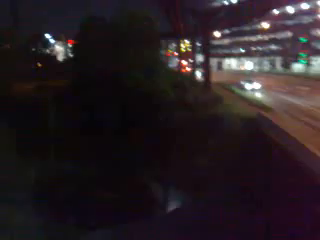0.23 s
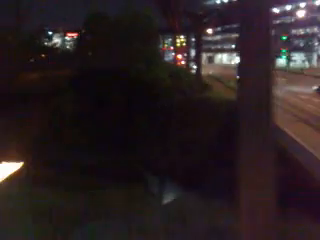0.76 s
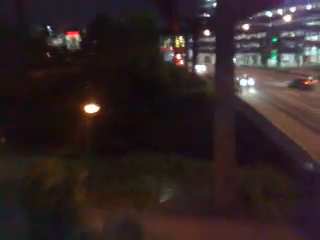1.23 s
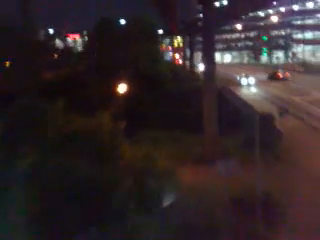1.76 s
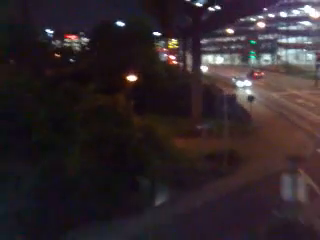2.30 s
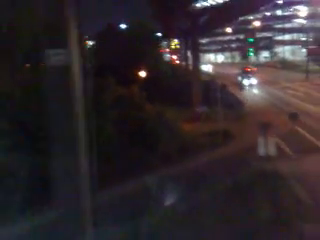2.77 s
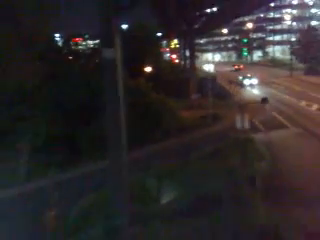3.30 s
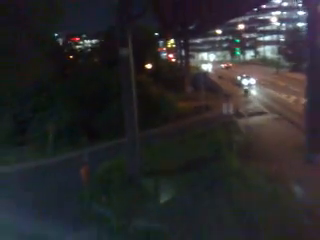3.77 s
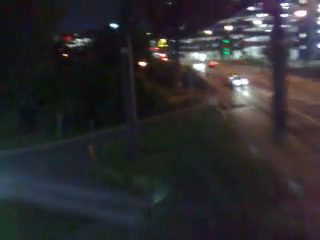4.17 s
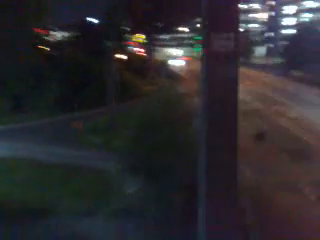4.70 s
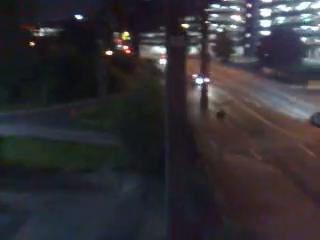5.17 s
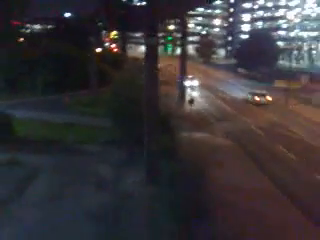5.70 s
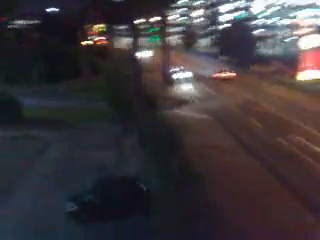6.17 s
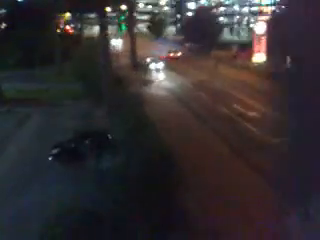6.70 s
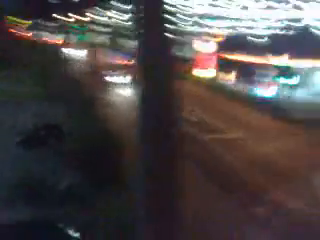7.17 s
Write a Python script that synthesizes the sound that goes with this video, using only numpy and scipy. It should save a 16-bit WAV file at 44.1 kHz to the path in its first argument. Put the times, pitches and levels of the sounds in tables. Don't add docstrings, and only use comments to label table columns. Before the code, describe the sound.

Inside a suspended rail car gliding above a night road, the beam and body rumble constantly while rubber tyres roar softly overhead. Fans and electrics hum underneath. Low thumps and roof knocks cluster in the middle, pillars pass with brief swishes, and small high chirps appear. Towards the end a raspy mains buzz grows as the drive takes power. A small camera microphone makes it narrow, dull and grainy.

```python
import sys
import numpy as np
from scipy import signal
from scipy.fft import rfft, irfft, dct, next_fast_len
from scipy.io import wavfile
from scipy.ndimage import uniform_filter1d

SR = 44100
rng = np.random.default_rng(int(sys.argv[2]) if len(sys.argv) > 2 else 0)


def invert_db(x):
    u = np.asarray(x, float) / 20
    return 10 ** u


def int16_out(signal):
    q = np.round(np.clip(np.atleast_2d(signal).T, -1, 1) * 32767)
    wavfile.write(sys.argv[1], SR, q.astype(np.int16))


N = 328545
TIME = np.arange(N) / SR
MAINS_HZ = 50.055
CAMERA_SR = 16000


def curves(table):
    s, *columns = np.transpose(table)
    return [np.interp(TIME, s, c) for c in columns]


def colour(hz, table):
    table_hz, table_db = np.transpose(table)
    return np.interp(np.log(np.maximum(hz, 1)), np.log(table_hz), table_db)


def unit(x):
    return x / np.sqrt(np.mean(x ** 2))


def smooth_twice(x, size):
    return uniform_filter1d(uniform_filter1d(x, size), size)


def walk(rate_hz):
    k = int(SR / rate_hz)
    held = np.repeat(rng.standard_normal(N // k + 1), k)
    return 1.3 * smooth_twice(held, k)[:N]


def bell(s, length_s):
    return np.exp(-.5 * ((TIME - s) / length_s) ** 2)


def swells(events):
    return sum(np.outer(row[1:-1], bell(row[0], row[-1])) for row in events)


def layers(table, edges_hz, levels_db, flicker_db, rate_hz, even=0.):
    size = next_fast_len(N)
    hz = np.arange(size // 2 + 1) * SR / size
    noise = rfft(rng.standard_normal(size)) * invert_db(colour(hz, table))
    above = [1 / (1 + (e / np.maximum(hz, 1)) ** 12) for e in edges_hz]
    out = 0
    for k, db in enumerate(levels_db):
        band = irfft(noise * above[k] * (1 - above[k + 1]), size)[:N]
        power = smooth_twice(band ** 2, SR // 20)
        band = band * (np.mean(power) / power) ** (even / 2)
        out = out + band * invert_db(db - np.mean(db) + flicker_db * walk(rate_hz))
    return unit(out)


def tone(hz, wander_hz=0., rate_hz=4):
    cycles = np.cumsum(hz + wander_hz * walk(rate_hz)) / SR + rng.random()
    return np.sqrt(2) * np.sin(2 * np.pi * cycles)


def rumble():
    # start_s, sway_db, boom_db, length_s
    lurches = [(.05, -0.5, 2.5, 0.1), (.35, 2, 2.5, 0.11), (.87, -2, -7.5, .05), (1.06, 12, 2, .05),
               (1.3, 0, 4, 0.086), (1.52, 10, 2, 0.093), (1.88, 3.5, 5, .1), (2.48, 6.5, 4, 0.055),
               (2.63, 5.5, -4.5, 0.045), (2.74, 7, -0.5, 0.034), (2.87, 7, 6, .04), (2.99, 4, 1, .04),
               (3.08, 0.5, 8, 0.043), (3.26, 0.5, 8, 0.028), (3.49, -8, 5, 0.04), (3.78, 5.5, -1.5, 0.063),
               (4.0, 3, 0, .07), (4.43, -2, 5.5, 0.046), (4.84, -1.5, 4, .04), (5.25, -2, 4.5, 0.037),
               (5.52, 10.5, 8, .07), (5.76, 4.5, 11.5, .035), (6.06, -8.5, 0, 0.052), (6.35, 2, 6, 0.16),
               (6.98, 6, 0, .05), (7.24, 3.5, -1.5, .05)]
    # start_s, level_db
    track = [(0, 2), (.9, -2), (1.2, 0), (2.1, 3), (2.8, -2.5), (3.3, 0), (4.45, 1), (5.2, -3.5),
             (5.55, -1), (5.85, -2), (6.4, -1.5), (7.45, -1.5)]
    boom_per_track, panel_per_boom = 0.28, 0.12
    sway_db, boom_db = swells(lurches)
    track_db = curves(track)[0]
    return [sway_db, boom_db + boom_per_track * track_db, track_db + panel_per_boom * boom_db]


def body():
    # freq_hz, level_db (per Hz)
    shell = [(12, -34), (24, -2.5), (32, -6.5), (58, 0), (78, -7.5), (97, -2), (112, -8), (140, -7.5),
             (160, -8.5), (180, -6.5), (214, -10.5), (225, -8), (240, -14.5), (290, -16.5), (450, -20.5),
             (600, -44.5)]
    # start_s, peak_db, pitch_hz, t60_s
    joints = [
        (1.544, -12, 185.6, 0.24),
        (1.815, -13, 155, 0.2),
        (3.086, -13, 186, 0.34),
        (3.235, -7, 176.6, 0.25),
        (3.322, -21, 177, 0.17),
        (3.429, -17, 175, 0.22),
        (3.561, -17.5, 184.5, 0.21),
        (3.63, -18.5, 179, 0.16),
        (3.816, -10, 178.4, 0.18),
        (3.959, -11, 185, 0.15),
    ]
    out = invert_db(-22.5) * layers(shell, [14, 45, 125, 440], rumble(), flicker_db=-1.5, rate_hz=10, even=0.62)
    for s, db, hz, t60_s in joints:
        t = np.maximum(TIME - s, 0)
        attack = 1 - np.exp(-t / 0.0071)
        decay = np.exp(-np.log(1000) * t / t60_s)
        out += invert_db(db - 1.0) * attack * decay * np.sin(2 * np.pi * hz * t)
    return out


def rolling():
    # start_s, load_db, wall_nearness_db
    tyres = [(0, -2.5, 2), (.3, 1.5, 0.5), (.75, -1.5, 4.5), (1.05, 0.5, 0), (1.4, -1, -0.5),
             (2.0, 0.5, 0.5), (2.35, 3, -1), (2.65, 4, -2.5), (2.95, 3.5, -3), (3.28, 1, 0.5),
             (3.4, -2, -2.5), (4.0, -1, -2), (5.1, -0.5, -5), (5.75, -1.5, -2), (6.4, -2.5, -0.5),
             (6.6, -2, 0), (7.1, 2, 1.5), (7.45, -5, 1)]
    # start_s, level_db, extra_treble_db, length_s
    pillars = [(.24, 2.5, 1, .04), (.45, 6.5, -2.5, .035), (.59, 4.5, -2, .03), (.97, 1.5, 1, .03),
               (1.49, -1, 2.5, 0.023), (1.78, 2, -1, 0.06), (2.45, 1.5, -1, .04), (2.84, 3, -1.5, 0.046),
               (3.15, 0, 2, 0.033), (3.75, 2, 5.5, 0.033), (4.43, 4.5, -0.5, 0.036), (5.48, 1, 1.5, 0.034),
               (5.62, 2.5, 1.5, 0.025), (6.69, 3, 5.5, .03), (7.11, -1, 6, 0.079), (7.4, 1, 3.5, 0.043)]
    per_load = (0.52, 1., 0.49, 0.55)
    per_wall = (0.0089, 0.01, 0.98, .4)
    per_pillar = (0.36, 1.1, 0.97, 0.33)
    per_treble = (0.013, 0.011, 0.16, 1.4)
    causes_db = np.vstack([curves(tyres), swells(pillars)])
    return np.array([per_load, per_wall, per_pillar, per_treble]).T @ causes_db


def wheels():
    # freq_hz, level_db (per Hz)
    tread = [(200, -35), (300, -3.5), (430, -8), (520, -10.5), (640, -10.5), (1000, -15), (1480, -18),
             (1700, -24.5), (2350, -22.5), (3050, -25), (3700, -33), (4150, -29), (5000, -36.5),
             (5550, -39.5), (6200, -40), (7000, -57.5), (7600, -74)]
    # freq_hz, width_hz, level_db
    cabin = [(710.4, 22, -0.5), (1021, 30, 2.5), (1214, 40, 4), (1404, 21, -0.5), (1500, 21, 2.5),
             (2109, 24, 3), (2334, 40, 4), (2656, 24, 2.5), (2990, 40, 3)]
    roll = layers(tread, [300, 640, 1650, 3350, 7400], rolling(), flicker_db=0.8, rate_hz=12, even=0.32)
    rings = 0
    for hz, width_hz, db in cabin:
        b, a = signal.iirpeak(hz, hz / width_hz, SR)
        rings = rings + invert_db(db - 6.5 + 4.4 * walk(3)) * signal.lfilter(b, a, roll)
    return invert_db(-37) * (roll + rings)


def electrics():
    # start_s, level_db
    current = [(0, 0), (.9, -1), (1.4, -5), (2.05, -4.5), (2.25, -2.5), (2.85, -4), (3.3, -7.5), (4.0, -7),
               (4.2, -11.5), (4.35, -4), (4.65, -10.5), (4.85, 1.5), (5.6, -2.5), (5.95, -2), (6.3, -1.5),
               (7.45, 1)]
    current_db = curves(current)[0]
    power_on_s, power_rise_db = 5.2, 3
    traction = np.clip((TIME - power_on_s) / 0.19, 0, 1)
    sixth_db = -35 + .6 * current_db + power_rise_db * traction
    twelfth_db = -40.5 + current_db
    slows_s, beat_hz, slower_beat_hz, depth = 3.5, 2., 1.82, .85
    beats = (TIME - slows_s) * np.where(TIME < slows_s, beat_hz, slower_beat_hz)
    beat_power = (1 + depth ** 2 - 2 * depth * np.cos(2 * np.pi * beats)) / (1 + depth) ** 2
    blade_db = -35.5 + 0.25 * (TIME - slows_s) + 10 * np.log10(beat_power)
    panel_db = 6 * bell(3.5, 0.23)
    third_db = -36 - 1.2 * current_db + panel_db + 3 * walk(5)
    return sixth_db, twelfth_db, blade_db, third_db


def hum():
    # start_s, level_db
    whine_level = [(0, -81.5), (2.3, -74), (2.45, -59.5), (2.8, -61.5), (3.15, -63), (3.45, -64.5),
                   (3.95, -62), (4.2, -82.5), (7.45, -81)]
    fan_hz, fan_db, whine_hz = 59.6, -37, 4096
    sixth_db, twelfth_db, blade_db, third_db = electrics()
    sixth = invert_db(sixth_db - 1 + walk(25)) * tone(6 * MAINS_HZ, .6, 12)
    twelfth = invert_db(twelfth_db - 1 + walk(25)) * tone(12 * MAINS_HZ, .9, 12)
    blade = invert_db(blade_db - 1) * tone(fan_hz * 6, .7)
    third = invert_db(third_db - 9) * tone(fan_hz * 3, 3., 8)
    shaft = invert_db(fan_db + 2 * walk(2.9)) * tone(fan_hz, 2.)
    whine = invert_db(curves(whine_level)[0] + 2 * walk(40)) * tone(whine_hz, 10., 40)
    return sixth + twelfth + blade + third + shaft + whine


def passing():
    # start_s, freq_hz, width_hz, level_db, length_s
    swishes = [(0.41, 2580, 704, -48, 0.021), (0.987, 2400, 820, -46, 0.033),
               (1.464, 4530, 730, -59, 0.023), (3.743, 6020, 310, -58, 0.027),
               (4.42, 2980, 690, -46.5, .035), (6.695, 2840, 250, -44.5, 0.03),
               (6.696, 4570, 607, -49.5, 0.023), (6.648, 2850, 120, -57.5, .25),
               (0.555, 2000, 885, -48.5, 0.037), (2.5, 2520, 760, -49, 0.094),
               (7.105, 2100, 650, -48, 0.063)]
    # start_s, pitch_hz, level_db, length_s
    chirps = [
        (2.92, 4020, -60, .02),
        (3.16, 3950, -59, .025),
        (4.78, 4230, -61, .015),
        (5.005, 4210, -55, .015),
        (5.21, 4300, -55, .02),
        (5.84, 4300, -59, .012),
        (6.03, 4220, -57, .025),
    ]
    out = 0
    for s, hz, width_hz, db, length_s in swishes:
        sos = signal.butter(2, [hz - width_hz / 2, hz + width_hz / 2], "band", fs=SR, output="sos")
        hiss = unit(signal.sosfilt(sos, rng.standard_normal(N)))
        out = out + invert_db(db) * bell(s, length_s) * hiss
    for s, hz, db, length_s in chirps:
        out = out + invert_db(db + 2 * walk(80)) * bell(s, length_s) * tone(hz, 12., 40)
    return out


def choke():
    # start_s, level_db
    effort = [(0, -68), (.3, -67), (.44, -81.5), (.56, -66.5), (.81, -62.5), (1.3, -68.5), (1.9, -83.5),
              (2.03, -69.5), (3.6, -69), (4.25, -65.5), (4.75, -71.5), (5.44, -55.5), (5.77, -50),
              (6.27, -50), (6.43, -45.5), (6.87, -49.5), (7.2, -49), (7.45, -41.5)]
    # start_s, level_db, length_s
    surges = [
        (3.76, 5, 0.036),
        (6.68, 1, 0.055),
        (7.07, 5.5, .035),
        (7.26, 3, 0.02),
        (7.37, -5, 0.023),
    ]
    # freq_hz, level_db
    housing = [(1400, -6), (2000, -11.5), (2450, -15.5), (2850, -3.5), (3400, -14), (4300, -9.5),
               (5000, -9.5), (5500, -9), (5850, -8), (6300, -3), (6650, 1), (6950, -8.5), (7150, -8.5),
               (7500, -32.5)]
    # freq_hz, level_db
    loud_partials = [(4506, -65), (4807, -66), (4904, -66), (5103, -68), (5206, -67), (5308, -70),
                     (5405, -68), (5507, -73), (5604, -68), (5706, -69), (5809, -61), (5905, -65),
                     (6008, -64), (6105, -63), (6207, -65), (6309, -61), (6406, -63), (6605, -55),
                     (6708, -58), (6804, -68), (6907, -65), (7106, -79), (7208, -71), (7305, -71),
                     (7413, -80), (1802, -64), (2002, -64), (2703, -64), (2803, -62)]
    peaks_db = {int(round(hz / MAINS_HZ)): db for hz, db in loud_partials}
    partials = 0
    for k in range(28, 149):
        hz = k * MAINS_HZ
        odd_loss_db = 9 * (k % 2)
        db = colour(hz, housing) - 60 - odd_loss_db + 3 * np.clip(rng.standard_normal(), -2, .5)
        swell_db = 4.5 * np.minimum(rng.standard_normal(60), 1)
        swell = np.interp(TIME, np.linspace(0, TIME[-1], 60), invert_db(swell_db))
        sine = np.sin(2 * np.pi * (hz * TIME + rng.random()))
        partials = partials + invert_db(peaks_db.get(k, db)) * swell * sine
    buzz_db = curves(effort)[0] + swells(surges)[0]
    partials = unit(partials) * invert_db(0.61 * np.minimum(buzz_db + 58.0, 0))
    sizzle = layers(housing, [3460, 4500, 5500, 6500, 7500], [0, 0, 0, 0], flicker_db=3.0, rate_hz=20)
    return (partials + invert_db(-7.5) * sizzle) * invert_db(buzz_db + 3.0)


def scene():
    return (body() + wheels() + hum() + passing() + choke())[None]


def camera_rounding(x):
    # freq_hz, step_db
    least_step = [(3000, -60), (4500, -53), (4650, -48), (5200, -48), (5350, -50), (6500, -50), (6850, -53),
                  (7000, -44), (7150, -41), (7300, -39)]
    # freq_hz, step_over_level_db
    step_over = [(1000, -12), (2500, -5), (3100, -2), (3300, 4), (4500, 4), (4650, 4), (5200, 4), (5350, 3),
                 (6800, 2), (7000, 6)]
    m, grid, group = 1024, 851, 32
    count = len(x) // m + 3
    padded = np.concatenate([np.zeros(2 * m - grid), x, np.zeros(3 * m)])
    window = np.sin(np.pi * (np.arange(2 * m) + .5) / (2 * m))
    blocks = padded[np.arange(count)[:, None] * m + np.arange(2 * m)] * window
    a, b, c, d = np.split(blocks, 4, axis=1)
    lines = dct(np.hstack([-c[:, ::-1] - d, a - b[:, ::-1]]), type=4, norm="ortho")
    hz = (np.arange(m) + .5) * CAMERA_SR / (2 * m)
    nearby = np.sqrt(np.mean(lines.reshape(count, -1, group) ** 2, axis=2)).repeat(group, axis=1)
    scatter = rng.standard_normal((count, m // group)).repeat(group, axis=1)
    scatter_db = np.where(hz > 6750, 5.5, 2.2) * scatter
    step = invert_db(colour(hz, least_step)) + nearby * invert_db(colour(hz, step_over))
    step = step * invert_db(scatter_db)
    lines = np.sign(lines) * np.floor(np.abs(lines) / step + .4) * step
    spread = .8 * lines + .42 * (np.roll(lines, 1, axis=1) - np.roll(lines, -1, axis=1))
    lines = np.where(hz > 5250, spread, lines) * (hz < 7450)
    u, v = np.split(dct(lines, type=4, norm="ortho"), 2, axis=1)
    blocks = np.hstack([v, -v[:, ::-1], -u[:, ::-1], -u]) * window
    return (blocks[1:, :m] + blocks[:-1, m:]).ravel()[m - grid:][:len(x)]


def top_cut(x):
    return signal.sosfilt(signal.butter(12, 9100, fs=SR, output="sos"), x)


def record(dry):
    lead = 441 * 32
    overloaded = np.tanh(1.5 * dry[0]) / 1.5
    low = signal.resample_poly(np.pad(overloaded, lead, "reflect"), 160, 441)
    x = signal.resample_poly(camera_rounding(low), 441, 160)[lead:lead + N]
    sos = signal.butter(6, [8530, 8980], "band", fs=SR, output="sos")
    mirror = signal.sosfilt(sos, x * np.cos(2 * np.pi * CAMERA_SR * TIME))
    return top_cut((x + invert_db(-33) * mirror)[None])


dry = scene()
out = record(dry)
int16_out(out)
```